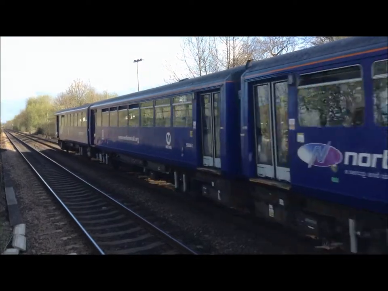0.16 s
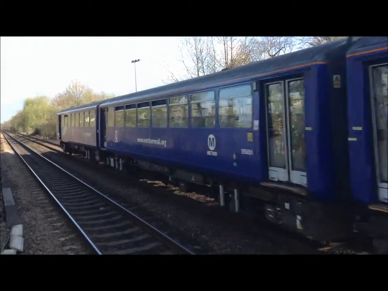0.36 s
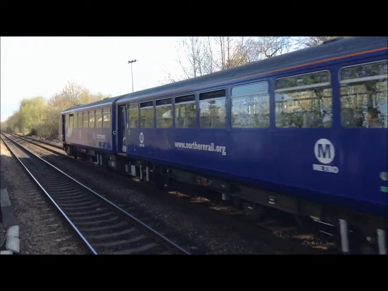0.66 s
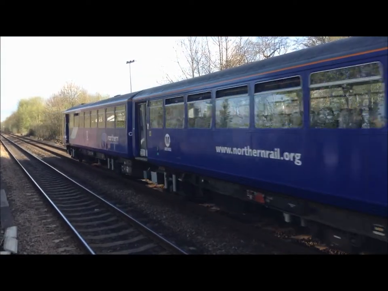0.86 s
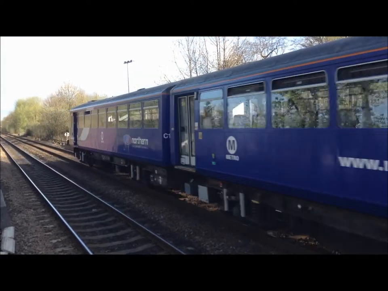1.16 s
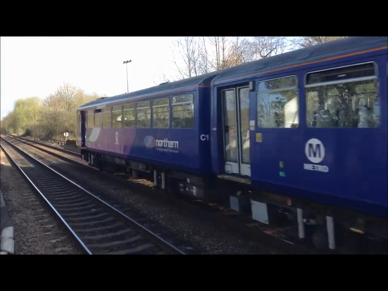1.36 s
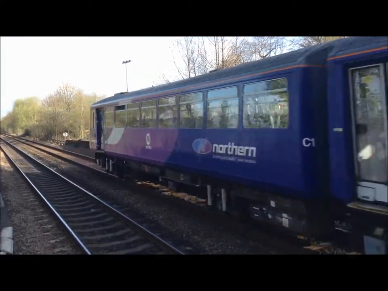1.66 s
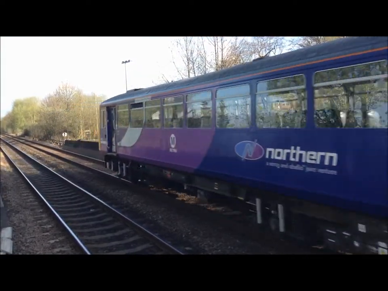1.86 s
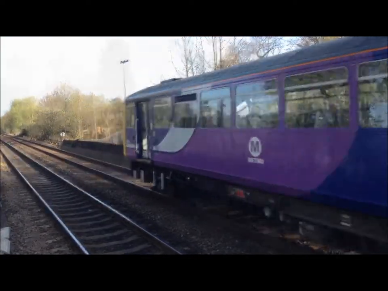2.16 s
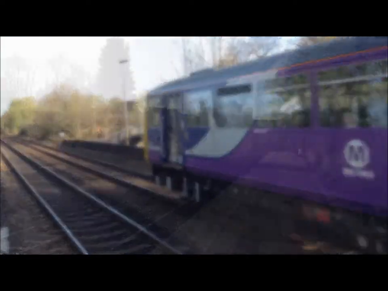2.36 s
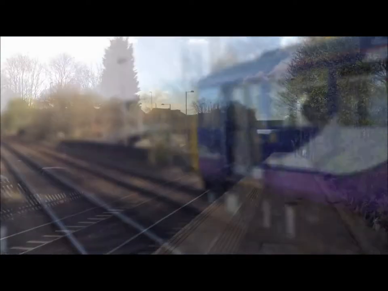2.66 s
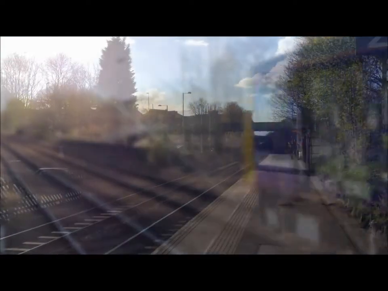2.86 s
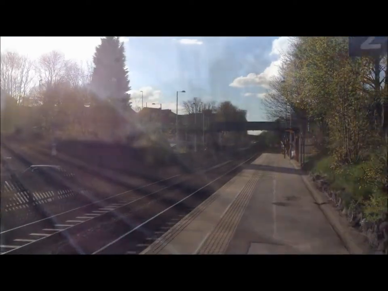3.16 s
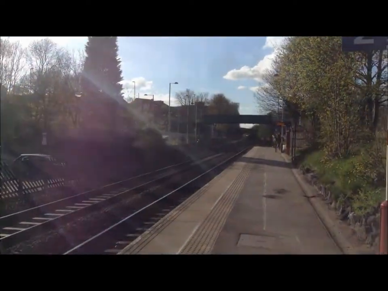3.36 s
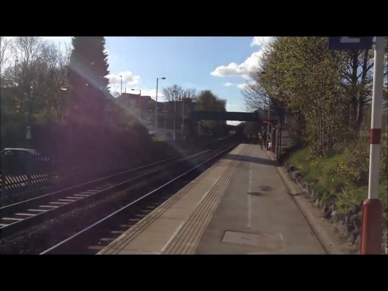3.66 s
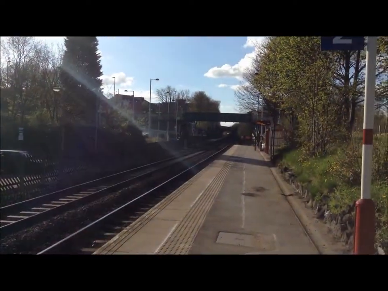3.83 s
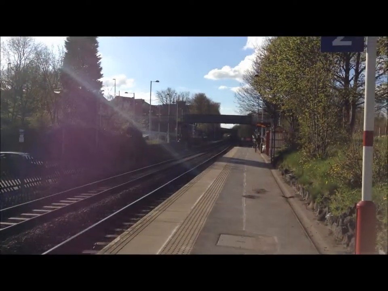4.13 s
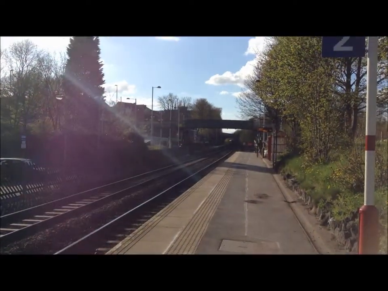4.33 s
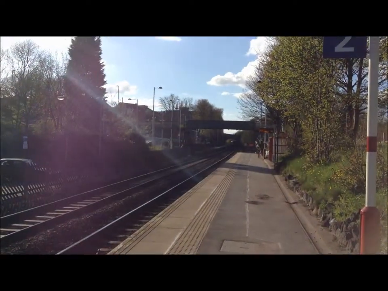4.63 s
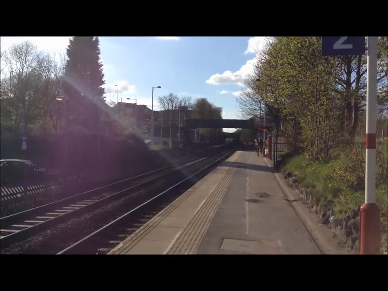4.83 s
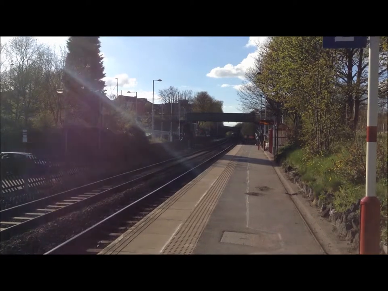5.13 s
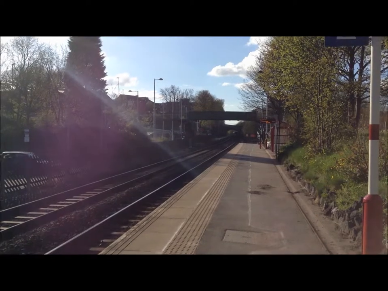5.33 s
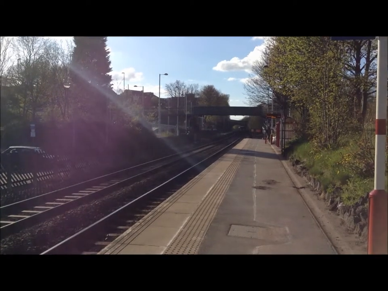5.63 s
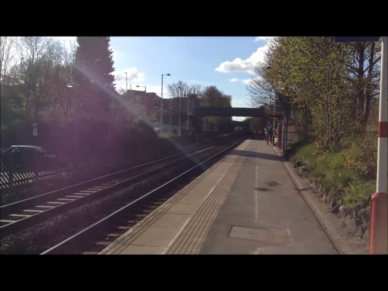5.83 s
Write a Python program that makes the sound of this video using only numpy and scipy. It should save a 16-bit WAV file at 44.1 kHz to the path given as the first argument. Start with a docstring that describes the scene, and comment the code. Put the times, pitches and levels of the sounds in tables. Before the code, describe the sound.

From 0 seconds a diesel railcar is already running past at very close range, loud and dense: a boomy, clattering underframe roar, rough steel rolling and bright gritty flange hiss. Metallic wheel ringing swells at about 0.3, 0.5, 0.9, 1.8 and 2.0 seconds. A low idling diesel throbs underneath, strongest near 0.9, and rapid sharp spits of air flutter past around 1.15. From roughly 2.4 a thin, rasping, extremely high squeal appears, growing clearer at 2.9 as the tail passes and the roar falls away. More faint ringing follows at 3.1 and 3.5, with two quick dull thuds just after 3.5. At 3.6 the sound cuts abruptly to a much quieter outdoor platform: distant low traffic rumble and soft tyre wash, with a faint tread hum fading after 5.3. A far engine gradually climbs in pitch and loudness toward the end. Everything is centred mono, with muted extreme treble.

```python
"""Diesel railcar close past a platform, then the empty platform

A railcar runs by very near the microphone: filtered noise and random knocks make the underframe's roar and
the rolling wheels, noise through wheel modes makes the ringing, firing harmonics make the idling engine,
noise bursts its spits of air, and one unsteady sine the flange squeal. A cut leads to the empty platform:
a far road of shaped noise and a far engine gathering speed. Both channels carry the same signal."""
import sys
import numpy as np
from scipy import signal
from scipy.fft import rfft, irfft, next_fast_len
from scipy.io import wavfile
from scipy.ndimage import uniform_filter1d, map_coordinates

SR = 44100
rng = np.random.default_rng(int(sys.argv[2]) if len(sys.argv) > 2 else 0)


def wav_record(signal):
    """Record a signal, one row per channel, as 16-bit PCM in the file named by sys.argv[1]."""
    frames = np.transpose(np.atleast_2d(signal))
    bounded = np.clip(frames, -1, 1)
    # unit amplitude maps onto the largest positive 16-bit level
    quanta = np.round(bounded * 32767).astype(np.int16)
    wavfile.write(sys.argv[1], SR, quanta)


N = 264159
TIME = np.arange(N) / SR
CUT_S = 3.596  # from the passing train to the empty platform
TAIL_S = 2.886  # the train's tail goes by; roar and rolling fade from here


def amp(db):
    """Decibels to gain."""
    return 10 ** (np.asarray(db) / 20)


def unit(x):
    """Scale to rms 1."""
    return x / np.sqrt(np.mean(x ** 2) + 1e-20)


def since(s):
    """Seconds gone by after the moment s, zero before it."""
    return np.maximum(TIME - s, 0)


def swell(s, half):
    """A bell-shaped rise and fall around the moment s, at 0.61 of its peak half seconds away."""
    return np.exp(-((TIME - s) / half) ** 2 / 2)


def curves(rows):
    """One value per sample for each column after the time."""
    s, *cols = np.transpose(rows)
    return [np.interp(TIME, s, c) for c in cols]


def wobble(rate):
    """A smooth random curve, rate knots a second."""
    knots = rng.standard_normal(int(N * rate / SR) + 4)
    return map_coordinates(knots, [TIME * rate])


def filtered(x, response):
    """x times a response of frequency."""
    m = next_fast_len(N + SR // 4)  # padding keeps the end from wrapping onto the start
    return irfft(rfft(x, m) * response(np.fft.rfftfreq(m, 1 / SR)), m)[:N]


def coloured(x, spectrum):
    """x shaped by (frequency [Hz], level [dB]) points on a log axis, at rms 1."""
    f, db = np.transpose(spectrum)

    def response(hz):
        return amp(np.interp(np.log(hz + 1), np.log(f), db, left=-120))
    return unit(filtered(x, response))


def resonant(x, modes):
    """x through resonances, each a band-pass applied twice for steep skirts, at rms 1."""
    def response(f):
        total = 0
        for centre, width, db in modes:
            band_pass = 1j * f * width / (centre * centre - f * f + 1j * f * width)
            total = total + amp(db) * band_pass ** 2
        return total
    return unit(filtered(x, response))


def rush(patchy_db):
    """Noise whose strength drifts in patches of time and frequency, at rms 1."""
    z = signal.stft(rng.standard_normal(N), nperseg=512)[2]
    field = uniform_filter1d(rng.standard_normal(z.shape), size=4, axis=0)
    field = uniform_filter1d(field, size=16, axis=1)
    return unit(signal.istft(z * amp(patchy_db * unit(field)), nperseg=512)[1][:N])


def knocks(rate, spread_db):
    """Blows at random moments, rate a second on average and of uneven size, at rms 1."""
    chance, size = rng.random(N), rng.standard_normal(N)
    return unit((chance < rate / SR) * np.sign(size) * amp(spread_db * np.abs(size)))


def road(growth_db_per_s=0.4):
    """Far traffic: a slowly growing rumble, tyre noise dulled by distance, and the hum of the treads."""
    # spectra of rumble and tyres at the platform: (frequency [Hz], relative level [dB])
    rumble_spectrum = [(30, -38), (60, -19), (95, -7), (125, -9), (190, 4.5), (260, 2.5), (330, 1.5),
                       (400, -9.5), (470, -1), (600, 4), (720, 0), (900, -42)]
    tyre_spectrum = [(500, -20), (800, -4.5), (960, -3), (1200, -2.5), (1450, -6.5), (2000, -6.5),
                     (2800, -14.5), (4000, -23), (5000, -35), (7000, -43.5), (9000, -48), (15000, -56)]
    # resonance of the tread hum: (centre [Hz], width of one band-pass [Hz], level [dB])
    tread_modes = [(967, 154, 0)]
    rumble_db, tyre_db, tread_db = -47.5, -44.4, -49
    tread_leaves_s, tread_fade_db_per_s = 5.3, 10  # the hum dies away as its car leaves
    rumble = amp(rumble_db + growth_db_per_s * since(CUT_S)) * coloured(rng.standard_normal(N), rumble_spectrum)
    tyres = amp(tyre_db) * coloured(rush(patchy_db=1.5), tyre_spectrum)
    hum_db = tread_db - tread_fade_db_per_s * since(tread_leaves_s) + wobble(10)
    return rumble + tyres + amp(hum_db) * resonant(rng.standard_normal(N), tread_modes)


def engine(hz, db, orders, unsteady, fading_db):
    """Harmonics of an unsteady firing rate, each drifting in strength on its way."""
    phase = 2 * np.pi * np.cumsum(hz * (1 + unsteady * wobble(25))) / SR
    tone = np.zeros(N)
    for k, level in orders:
        strength = amp(level + fading_db * wobble(4.9))
        tone += strength * np.sin(k * phase + 2 * np.pi * rng.random())
    return amp(db) * unit(tone)


def far_engine():
    """An engine gathers speed and blares as its harmonics climb into the exhaust resonance."""
    # harmonics of the firing rate: (multiple, relative level [dB])
    motor_orders = [(1, -13), (2, 1), (3, -1.5), (4, 1.5), (5, 3), (6, -1), (7, -1)]
    # resonance of the exhaust pipe: (centre [Hz], half width [Hz], lift [dB])
    exhaust = (465, 25, 9.6)
    open_s, open_hz, hz_per_s = 5.75, 75.7, 10.5  # in the open: the moment and its firing rate
    open_db, rise_db_per_s = -47.6, 15  # it grows until then; level ahead of the exhaust
    firing_hz = open_hz + hz_per_s * (TIME - open_s)
    level_db = open_db + rise_db_per_s * np.minimum(TIME - open_s, 0)
    tone = engine(firing_hz, level_db, motor_orders, unsteady=0.009, fading_db=2)
    centre, width, db = exhaust
    return filtered(tone, lambda f: amp(db / (1 + ((f - centre) / width) ** 2)))


def diesel():
    """The idling diesel under the floor: harmonics of its slowly falling firing rate."""
    # the engine as it goes by: (time [s], firing rate [Hz], level [dB])
    diesel_course = [(0, 41.74, -48.5), (.5, 41.3, -41.5), (.9, 41, -38), (1.3, 40.15, -52.5),
                     (2.2, 40.05, -49), (3.6, 39.5, -56)]
    # harmonics of the firing rate: (multiple, relative level [dB])
    diesel_orders = [(2, -10.5), (3, 1.5), (4, -5.5)]
    return engine(*curves(diesel_course), diesel_orders, unsteady=0.014, fading_db=1.5)


def compressor(rise=0.0038, life=0.011, count=12):
    """The engine's air compressor spits short bright bursts of noise, loudest as it goes by."""
    # spectrum of the escaping air: (frequency [Hz], relative level per Hz [dB])
    spit_spectrum = [(2500, -27), (6000, 0), (9500, -2.5), (13000, -5), (15200, -6)]
    nearest_s, crank_turn_s = 1.151, .0757
    pass_s = .13  # 3 dB down this long before and after the nearest point
    spit_db, halfway_db = -10.8, -8  # a spit each turn, a weaker one halfway between
    puffs = np.zeros(N)
    for k in range(-count, count):  # half turns of the crank
        offset = k * crank_turn_s / 2
        size_db = spit_db + halfway_db * (k % 2) + rng.standard_normal()
        size = amp(size_db) / np.hypot(1, offset / pass_s)
        age = since(nearest_s + offset)
        puffs += size * (1 - np.exp(-age / rise)) * np.exp(-age / life)
    return puffs * coloured(rng.standard_normal(N), spit_spectrum)


def squeal(waver_hz=11, drift_hz=8, rasp=0.55):
    """Stick and slip keep one high wheel mode singing unsteadily, with a rasp around the tone."""
    # the flange starts faintly, then catches: (time [s], level [dB])
    squeal_level = [(2.3, -55), (2.45, -39), (2.8, -38), (2.88, -31.5), (3.4, -32.3), (3.6, -38.5)]
    squeal_hz = 9087
    db, = curves(squeal_level)
    pitch_hz = squeal_hz + drift_hz * wobble(12) + waver_hz * wobble(220)
    phase = 2 * np.pi * np.cumsum(pitch_hz) / SR
    grip = amp(2.2 * wobble(35)) * (1 + rasp * wobble(300))
    return amp(db) * grip * np.sin(phase)


def ringing():
    """The wheels' modes swell and fade as they pass, strongest where the contact drives them."""
    # swells of ringing: (peak time [s], half length [s], level [dB], frequency driven hardest [Hz])
    ring_swells = [(.34, .16, -21, 2200), (0.492, 0.069, -23.5, 5000), (0.909, .07, -20.5, 2100),
                   (.98, 0.55, -23.5, 4050), (1.77, 0.096, -24.5, 5000), (2.03, 0.22, -24.5, 2100),
                   (2.305, 0.12, -27.5, 3800), (3.121, 0.14, -26.5, 4200), (3.528, .07, -26.5, 1296)]
    # modes of a wheel: (centre [Hz], width of one band-pass [Hz], level [dB])
    wheel_modes = [(1340, 220, 2), (1980, 160, 0), (2405, 130, -1.5), (3180, 160, 0), (4048, 206, -0.5),
                   (5020, 140, -2.5)]
    drive_octaves = 0.41  # the drive is 3 dB down this far from its centre
    out = np.zeros(N)
    for s, half, db, drive_hz in ring_swells:
        driven = []
        for hz, width, level in wheel_modes:
            octaves_off = np.log2(hz / drive_hz)
            driven.append((hz, width, level - 3 * (octaves_off / drive_octaves) ** 2))
        out += amp(db) * swell(s, half) * resonant(rng.standard_normal(N), driven)
    return out


def wheels():
    """Steel rolls on steel, louder at each axle, with gritty hiss from the flanges."""
    # spectra of rolling and hiss: (frequency [Hz], relative level per Hz [dB])
    rolling_spectrum = [(600, -20), (950, -2), (1400, -1), (2200, -2.5), (3000, -3.5), (3600, -7),
                        (4500, -9), (5600, -10.5), (7000, -16), (10000, -36)]
    hiss_spectrum = [(3000, -37), (5000, -2.5), (6800, -1.5), (8500, -0.5), (9500, -1.5), (11000, -4),
                     (13000, -7), (15200, -12)]
    # flange hiss, ahead of a 0.5 dB lift: (time [s], level [dB])
    flange_level = [(0, -23.5), (.5, -23.5), (.64, -27), (.92, -23), (1.25, -24.5), (1.95, -26.5),
                    (2.4, -24.5), (3.1, -27.5), (3.4, -30), (3.6, -37.5)]
    # rolling swells as wheels go by: (peak time [s], half length [s], lift [dB])
    axle_swells = [(.22, .3, 2.1), (.92, 0.2, 1), (2.18, 0.1, 1.8), (2.882, 0.025, 1.5), (3.1, 0.03, 1.5)]
    base_db, fade_db_per_s = -17, 8.5  # rolling alongside, and its fade behind the tail
    hiss_db, = curves(flange_level)
    judder = wobble(45)  # shared by rolling and hiss
    axles_db = sum(db * swell(s, half) for s, half, db in axle_swells)
    rolling_db = base_db + axles_db - fade_db_per_s * since(TAIL_S)
    rolling_gain = amp(rolling_db + .5 * judder + 0.17 * wobble(13))
    rolling = rolling_gain * coloured(rush(patchy_db=1.58), rolling_spectrum)
    grit = rush(patchy_db=1.1) + amp(-9.5) * knocks(rate=1500, spread_db=7.5)
    return rolling + amp(hiss_db + 0.5 + .45 * judder) * coloured(grit, hiss_spectrum)


def underframe():
    """Rough rail and engine clatter shake the frame, which booms in its resonances."""
    # spectrum of the broad roar: (frequency [Hz], relative level per Hz [dB])
    roar_spectrum = [(25, -53), (55, -40.5), (90, -29.5), (135, -17), (190, -8), (245, -5), (295, 0.5),
                     (380, -5), (430, -1.5), (510, -3.5), (580, -3.5), (740, -3), (950, -10), (1500, -40.5)]
    # resonances of underframe and track: (centre [Hz], width of one band-pass [Hz], level [dB])
    frame_modes = [(197, 54, -9.5), (290.6, 34, -3), (334.5, 17.4, -2), (434.7, 36, -4), (510.7, 37, 0.5),
                   (691, 43, -14), (734.5, 63, -8)]
    # strength of the boom, which swells twice: (time [s], level over the running gain [dB])
    boom_level = [(0, -8), (.8, -3.5), (1.7, -8), (2.05, -4.5), (3.6, -5)]
    # dull thuds from the departing car: (time [s], gain [dB])
    thud_times = [(3.5, -16), (3.544, -13.5)]
    thud_half_s = 0.0095
    running_db, fade_db_per_s = -14.5, 8  # gain alongside, and its fade behind the tail
    boom_db, = curves(boom_level)
    shaking = rush(patchy_db=0.5) + amp(-5.5) * knocks(rate=220, spread_db=5.5)
    broad = coloured(shaking, roar_spectrum)
    clatter = rng.standard_normal(N) + amp(-4.5) * knocks(rate=160, spread_db=-0.5)
    boom = resonant(clatter, frame_modes)
    running = amp(running_db - fade_db_per_s * since(TAIL_S) + .5 * wobble(30))
    thuds = sum(amp(db) * swell(s, thud_half_s) for s, db in thud_times)
    return np.hypot(running, thuds) * (amp(-2.25) * broad + amp(boom_db) * boom)


def scene():
    """The train close by, then an abrupt cut to the quiet platform."""
    train = diesel() + underframe() + wheels() + ringing() + compressor() + squeal()
    platform = road() + far_engine()
    before_cut = np.exp(-since(CUT_S) / .002)  # gives way within a few milliseconds
    mono = before_cut * train + (1 - before_cut) * platform
    return np.array([mono, mono])


def record(dry):
    """The recorder rounds off the highest peaks, then keeps nothing above its band limit."""
    top_hz = 15250  # middle of a 250 Hz wide slope
    held = dry / (1 + dry ** 8) ** (1 / 8)

    def band_limit(hz):
        return np.clip((top_hz - hz) / 250 + .5, 0, 1)
    return np.array([filtered(channel, band_limit) for channel in held])


dry = scene()
out = record(dry)
wav_record(out)
```